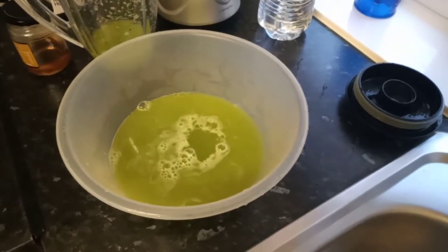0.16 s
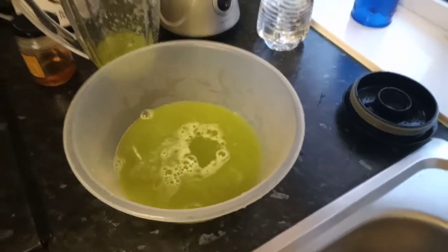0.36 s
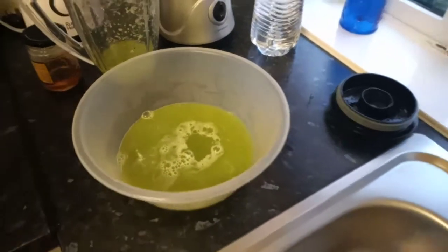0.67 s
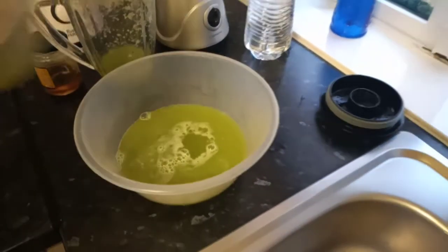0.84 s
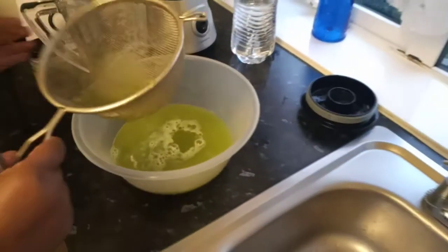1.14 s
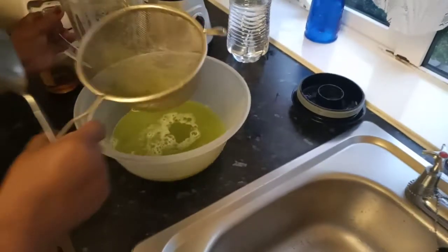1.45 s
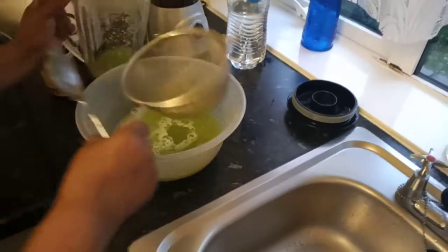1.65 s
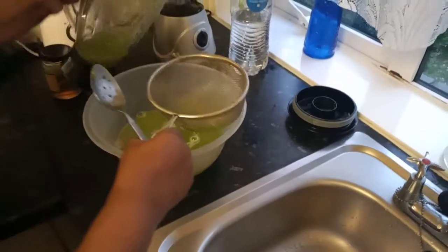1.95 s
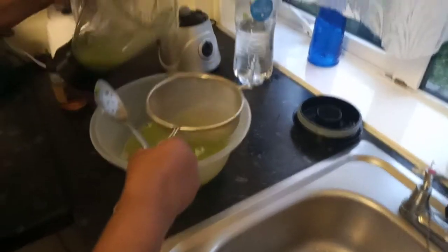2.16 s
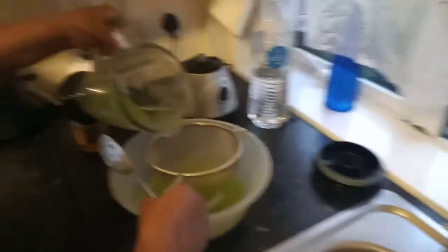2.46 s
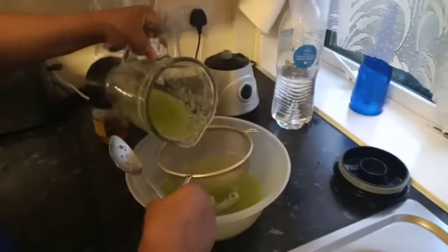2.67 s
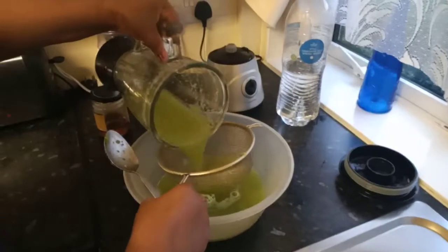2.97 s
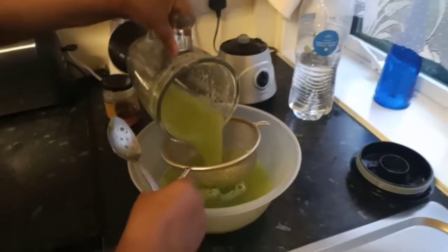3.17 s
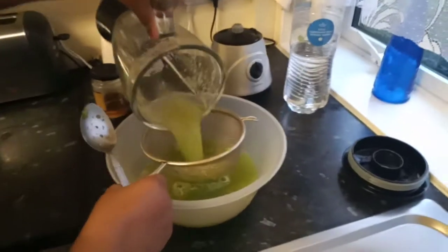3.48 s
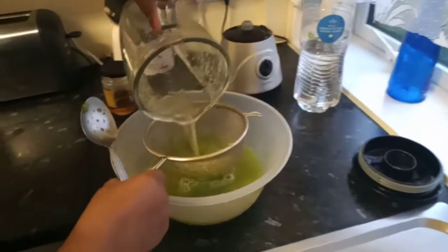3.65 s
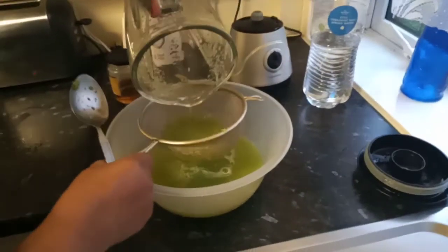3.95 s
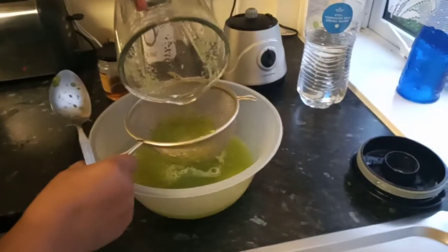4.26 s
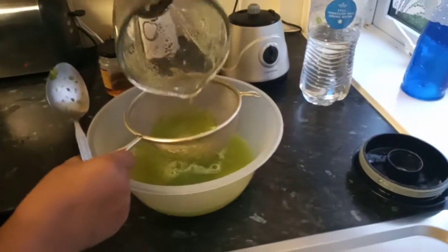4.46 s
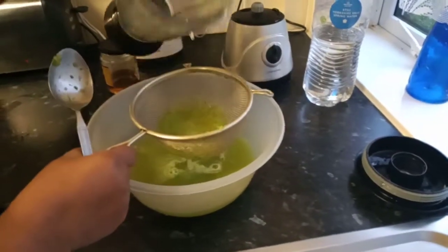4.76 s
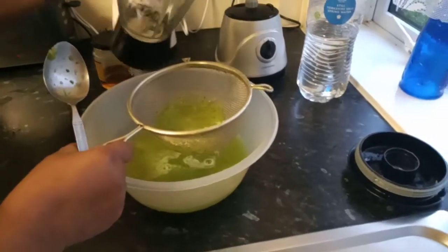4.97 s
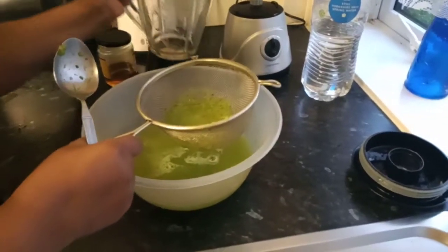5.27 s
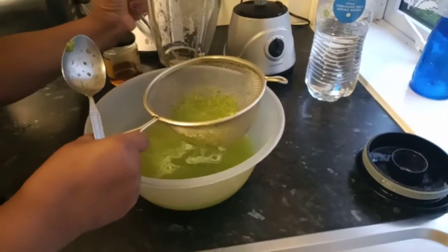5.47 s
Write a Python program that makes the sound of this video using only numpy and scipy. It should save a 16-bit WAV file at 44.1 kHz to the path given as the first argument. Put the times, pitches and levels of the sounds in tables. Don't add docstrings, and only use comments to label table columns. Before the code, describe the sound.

Handheld, close microphone, short hard-walled reverb. First, thin metal rubs and ringing clinks; near two seconds a cluster of hollow thuds from the jug's base, the loudest moment, with a sharp clink. A brief lull and one metal knock follow, then a quick bubbly pour with fizzing and snapping films, ending in sparse light drips over a very quiet fridge hum.

```python
import sys
import numpy as np
from scipy import signal
from scipy.fft import rfft, irfft, next_fast_len
from scipy.io import wavfile
from scipy.ndimage import map_coordinates

SR = 44100
rng = np.random.default_rng(int(sys.argv[2]) if len(sys.argv) > 2 else 0)


def elevation(decibels):
    levels = np.asarray(decibels, float)
    return 10 ** (levels / 20)


def output_pcm(signal):
    pcm = np.clip(np.atleast_2d(signal).T, -1, 1) * 32767
    wavfile.write(sys.argv[1], SR, np.round(pcm).astype(np.int16))


N = 247842


def unit(x):
    return x / np.sqrt(np.mean(x ** 2) + 1e-30)


def in_time(rows):
    s, *columns = np.transpose(rows)
    t = np.arange(N) / SR
    return [elevation(np.interp(t, s, db, -200, -200)) for db in columns]


def colour(x, spectrum):
    size = next_fast_len(N + 8192)
    hz, db = np.transpose(spectrum)
    bins_hz = np.maximum(np.arange(size // 2 + 1) * SR / size, 1)
    gain = elevation(np.interp(np.log(bins_hz), np.log(hz), db))
    cepstrum = irfft(np.log(gain), size)
    cepstrum[1:size // 2] *= 2
    cepstrum[size // 2 + 1:] = 0
    response = np.exp(rfft(cepstrum))
    return irfft(rfft(x, size) * response, size)[:N]


def band(x, low_hz, high_hz):
    return signal.sosfilt(signal.butter(3, [low_hz, high_hz], "band", fs=SR, output="sos"), x)


def drift(rate_hz):
    knots = int(N / SR * rate_hz) + 3
    return map_coordinates(rng.standard_normal(200), [np.linspace(0, knots, N)], order=3, mode="wrap")


def ring(x, hz, t60):
    decay = elevation(-60 / (t60 * SR))
    w = 2 * np.pi * hz / SR
    return signal.lfilter([0, np.sin(w)], [1, -2 * decay * np.cos(w), decay * decay], x + 1e-18)


def grains(per_s, spread_db):
    sizes = elevation(spread_db * np.minimum(rng.exponential(1, N), 5)) * rng.choice([-1, 1], N)
    return unit(sizes * (rng.random(N) < per_s / SR))


def add(out, s, sound):
    i = round(s * SR)
    out[i:i + len(sound)] += sound[:N - i]


def fridge():
    # pitch_hz, level_db (rms), flutter_db
    hum = [(149.5, -77.5, 4.5), (203, -78, 3.0), (307, -88.5, 2), (342.3, -67.5, 2.5), (439, -95, 9),
           (492, -91, 3.0), (1620, -99, 7.5), (3167, -103.5, 11.5), (3490, -100.5, -15.5),
           (3700, -94.5, 7.5), (3740, -88.5, 8)]
    # pitch_hz, level_db (per Hz)
    air = [(30, -18), (60, -7), (150, -2.5), (250, -1), (350, 0.5), (450, -16), (600, -19), (1300, -24),
           (3000, -26), (5800, -26), (8000, -39.5), (13500, -39.5), (15300, -35), (16200, -41)]
    t = np.arange(N) / SR
    lines = 0
    for hz, db, flutter_db in hum:
        level = elevation(db + flutter_db * drift(15))
        lines = lines + level * np.sin(2 * np.pi * hz * t + 0.7 * drift(9))
    air_level = elevation(-70 + 0.91 * drift(6.3))
    return np.sqrt(2) * lines + air_level * unit(colour(rng.standard_normal(N), air))


def slides():
    # start_s, dull_db, bright_db, top_db
    strokes = [
        [(0.0, -101, -81.5, -107), (0.16, -77, -55.5, -63), (0.276, -85, -68, -100), (0.62, -90, -80, -103)],
        [(0.7, -112, -74.5, -93), (0.966, -65.5, -57.5, -79), (1.1, -83, -77, -107)],
        [(1.12, -49.5, -58.5, -76), (1.286, -79.5, -55.5, -61), (1.52, -66.5, -71.5, -107)],
        [(1.56, -80.5, -70.5, -85), (1.65, -38.5, -44, -67.5), (1.85, -93.5, -83.5, -107)],
        [(2.0, -41, -56, -87), (2.024, -49.5, -65.5, -96), (2.312, -96, -70, -104), (2.58, -103, -91, -105)],
    ]
    # pitch_hz, level_db (per Hz)
    friction = [(300, -8), (600, 14), (1500, -1.5), (3500, -3), (6200, 4), (7800, -27.5), (13500, -6),
                (15300, -7.5), (16200, -26.5)]
    # pitch_hz, width_hz, level_db
    mesh = [(900, 90, 10.5), (1800, 62, 1.5), (2200, 45, 6.5), (2703, 110, -2), (4420, 350, 1.5),
            (5960, 260, -0.5)]
    rub = grains(5000, spread_db=1.5) * elevation(2.5 * drift(29.95))
    rim = sum(elevation(db) * unit(ring(rub, hz, 2.2 / width_hz)) for hz, width_hz, db in mesh)
    body = unit(colour(rub, friction)) + elevation(-20.5) * rim
    dull = unit(band(body, 349, 1200))
    bright = unit(band(body, 1800, 8500))
    top = unit(band(body, 8500, 16200))
    out = np.zeros(N)
    for stroke in strokes:
        dull_gain, bright_gain, top_gain = in_time(stroke)
        out += dull_gain * dull + bright_gain * bright + top_gain * top
    return out


def taps():
    # start_s, peak_db, dull_db, top_db, rattle_t60_s
    knocks = [
        (0.142, -34.5, -16, -5, 0.18),
        (0.9542, -49.5, -1.5, -31, 0.083),
        (1.11, -45.5, 6, -7, 0.2),
        (1.2403, -36.5, -7, -12, 0.3),
        (1.8615, -24.5, -16, -13, 0.13),
        (2.596, -34, -6.5, -28, 0.092),
        (2.8848, -67.5, -17, -25, 0.12),
        (5.223, -66.5, -7.5, -23, 0.096),
    ]
    # pitch_hz, level_db, t60_s
    spoon = [(1100, 6.5, 0.27), (1433, 5, 0.14), (2830, -6, 0.21), (3153, -21, 0.33), (3740, -22.5, 0.33),
             (4829, -1, 0.257), (5314, -11, 0.31), (5580, -0.5, 0.37), (6200, -19.5, 0.37),
             (6570, -7.5, 0.29), (6586, 3.5, 0.19), (7140, -10, 0.28)]
    out, t = np.zeros(N), np.arange(SR // 2) / SR
    for s, peak_db, dull_db, top_db, t60 in knocks:
        crack_and_rattle = elevation(-60 * t / 0.038) + elevation(-3.5 - 60 * t / t60)
        burst = rng.standard_normal(len(t)) * crack_and_rattle
        sound = 1.216 * band(burst, 1700, 7210)
        sound += 2.76 * elevation(dull_db) * band(burst, 750, 2000)
        sound += elevation(top_db) * (band(burst, 13800, 16000) + 0.344 * band(burst, 5800, 15000))
        for (hz, mode_db, mode_t60), luck_db in zip(spoon, rng.normal(0, 3.5, len(spoon))):
            strength_db = mode_db + luck_db - 16.5 + dull_db * (hz < 2000)
            sound += elevation(strength_db - 60 * t / mode_t60) * np.sin(2 * np.pi * hz * t)
        add(out, s, elevation(peak_db - 6.5) * sound)
    return out


def thuds():
    # start_s, peak_db, hardness_hz, boom_db
    landings = [
        (0.319, -58.5, 900, -13),
        (1.531, -37, 900, -4),
        (1.863, -18, 900, -6.5),
        (1.901, -11.5, 900, -23),
        (1.929, -26, 900, 6),
        (1.956, -13.5, 900, -5),
        (1.984, -27, 900, -13),
        (2.029, -28, 900, -23),
    ]
    # pitch_hz, level_db, t60_s
    worktop = [(195.2, -0.5, 0.36), (281.1, 8, 0.69), (427, -5.5, 0.45), (486, -14.5, 1.28),
               (543.6, 14.5, 0.58), (630, 7.5, 0.505), (719, -3, 0.586), (807, -3, 0.37), (904, 1, 0.31),
               (940, -32, 1.1), (1040, -43, 1.3), (1075, -37.5, 0.491), (1260, -39, 0.95),
               (1390, -11.5, 0.17), (1570, -45, 0.95), (1730, -37.5, 0.74), (1697, -25.5, 0.32),
               (1880, -39.5, 0.58), (1922, -33, 0.98), (1960, -38.5, 0.55), (2090, -33, 0.43)]
    out, t = np.zeros(N), np.arange(SR // 2) / SR
    for s, peak_db, hard_hz, boom_db in landings:
        board = 0
        for (hz, mode_db, t60), luck, turn in zip(worktop, *rng.normal(0, 1, (2, len(worktop)))):
            strength_db = 0.67 * mode_db + 3.06 * luck + (boom_db + 13) * (hz < 260)
            softness = 1 + (hz / hard_hz) ** 2
            level = elevation(strength_db - 60 * t / (0.5 * t60)) / softness
            board = board + level * np.sin(2 * np.pi * hz * t + 0.89 * turn)
        chatter = band(rng.standard_normal(len(t)) * elevation(-60 * t / 0.1), 99, hard_hz * 1.31)
        sound = board / np.abs(board).max() + 1.25 * chatter
        onset = np.clip(t / 0.0028, 0, 1)
        add(out, s - 0.002, elevation(peak_db - 1.5) * sound * onset)
    return out


def bubbles():
    # start_s, peak_db, pitch_hz, t60_s
    plops = [(3.178, -48.5, 1060, 0.051), (3.231, -52, 1630, 0.05), (3.279, -55, 1620, 0.06),
             (3.308, -59, 850, 0.063), (3.354, -50, 1580, 0.055), (3.373, -39, 1734, 0.054),
             (3.43, -36, 1552, 0.055), (3.471, -39.5, 1237, 0.033), (3.534, -54, 1345, 0.072),
             (3.561, -41, 1528, 0.11), (3.621, -50.5, 1354, 0.042), (3.65, -47, 1585, 0.043),
             (3.708, -61, 1540, 0.06), (3.729, -65, 1510, 0.067), (3.774, -62, 962, 0.11),
             (3.868, -70, 1440, 0.06), (3.91, -70, 890, 0.06), (3.971, -65, 902, 0.069),
             (4.006, -61.5, 1420, 0.063), (4.059, -55.5, 1615, 0.06), (4.136, -77, 1640, 0.06),
             (4.153, -70, 1600, 0.049)]
    blobs = [(3.1783, -56.5, 2290, 0.046), (3.218, -53, 2570, 0.04), (3.2523, -47.5, 1850, 0.035),
             (3.285, -48.5, 2554, 0.035), (3.3254, -43, 2700, 0.037), (3.36, -31, 2347, 0.024),
             (3.4302, -40.5, 2210, 0.031), (3.4551, -46, 2190, 0.04), (3.528, -55, 2800, 0.04),
             (3.5573, -44, 2440, 0.058), (3.5669, -43.5, 2066, 0.062), (3.6198, -39, 2083, 0.058),
             (3.6861, -56, 2100, 0.04), (3.7445, -59, 2140, 0.047), (3.7649, -48, 2070, 0.04),
             (3.8258, -60, 2060, 0.036), (3.8807, -68, 2010, 0.04), (3.8941, -62, 2250, 0.046),
             (3.9799, -67, 2040, 0.04), (4.0513, -62, 2190, 0.047), (4.091, -52, 2540, 0.028),
             (4.1476, -64, 2180, 0.058), (4.2578, -69, 2550, 0.04), (4.302, -68, 2640, 0.04),
             (4.3925, -71.5, 2690, 0.038), (4.5387, -68, 2250, 0.047), (4.6685, -56, 2000, 0.039),
             (4.8, -59.5, 2940, 0.046), (4.8525, -61, 2145, 0.032), (5.1203, -74, 1860, 0.034)]
    drips = [(3.1768, -62, 2820, 0.033), (3.23, -55, 2840, 0.028), (3.2596, -55, 3680, 0.028),
             (3.284, -62, 3580, 0.03), (3.3115, -52, 2990, 0.024), (3.3282, -40.5, 3270, 0.032),
             (3.3549, -52, 3000, 0.03), (3.393, -37.5, 2840, 0.029), (3.4306, -43, 3150, 0.03),
             (3.4467, -40, 3050, 0.022), (3.517, -55, 2800, 0.027), (3.5379, -43.5, 3470, 0.038),
             (3.5669, -44, 3240, 0.03), (3.6881, -58, 3600, 0.03), (3.7123, -53, 4610, 0.03),
             (3.733, -45, 3330, 0.029), (3.7644, -46, 2880, 0.029), (3.794, -52, 3140, 0.032),
             (3.8368, -63, 2900, 0.03), (3.9722, -71, 3710, 0.03), (4.085, -59.5, 3060, 0.03),
             (4.1062, -64, 3500, 0.028), (4.1446, -60, 4350, 0.036), (4.169, -56, 3150, 0.033),
             (4.261, -56.5, 3054, 0.037), (4.2946, -63, 3020, 0.03), (4.613, -73.5, 3580, 0.03),
             (4.626, -62, 3760, 0.03), (4.675, -50.5, 4160, 0.021), (4.8008, -52.5, 4460, 0.028),
             (4.83, -57, 4430, 0.03), (4.8515, -50, 3530, 0.03), (4.884, -56, 4500, 0.024),
             (4.9582, -48.5, 4310, 0.023), (5.0705, -74, 3670, 0.03), (5.122, -67.5, 3070, 0.03)]
    beads = [(3.1778, -73, 4850, 0.03), (3.217, -64, 6130, 0.03), (3.2411, -50.5, 6560, 0.036),
             (3.285, -56, 6640, 0.024), (3.3229, -42.5, 5970, 0.03), (3.3589, -44.5, 6010, 0.03),
             (3.4127, -56, 5500, 0.027), (3.4324, -53, 6050, 0.036), (3.4457, -50, 6480, 0.042),
             (3.518, -50, 5680, 0.035), (3.5357, -49.5, 5740, 0.038), (3.5529, -43, 5800, 0.03),
             (3.5673, -47, 5570, 0.034), (3.5894, -41.5, 5820, 0.037), (3.614, -44, 6080, 0.026),
             (3.6492, -47, 5330, 0.022), (3.7101, -51, 4800, 0.035), (3.767, -51, 5330, 0.033),
             (3.8921, -61, 4700, 0.03), (4.0044, -72, 5760, 0.03), (4.0578, -69, 5970, 0.03),
             (4.0872, -61.5, 5360, 0.034), (4.148, -64, 5430, 0.03), (4.1645, -66, 5740, 0.03),
             (4.2389, -80, 5220, 0.033), (4.2578, -67, 4680, 0.026), (4.2872, -69, 4730, 0.03),
             (4.5396, -62.5, 5560, 0.035), (4.616, -66, 5600, 0.037), (4.67, -58.5, 4470, 0.03),
             (4.8015, -59, 4840, 0.038), (4.828, -55.5, 4560, 0.032), (4.8879, -59.5, 4660, 0.033),
             (4.9497, -58, 4660, 0.035), (4.9932, -58, 5630, 0.03), (5.2082, -72, 5700, 0.03)]
    out, t = np.zeros(N), np.arange(SR // 6) / SR
    rows = plops + blobs + drips + beads
    for (s, peak_db, hz, t60), (apart, turn) in zip(rows, rng.normal(0, 1, (len(rows), 2))):
        phase = 2 * np.pi * hz * (0.985 * t + 0.95 * t ** 2)
        neighbour = 0.82 * np.sin(phase * (1 + 0.073 * apart) + 2 * turn)
        envelope = elevation(peak_db - 60 * t / t60) * (1 - np.exp(-t / 0.0012))
        add(out, s - 0.001, envelope * (np.sin(phase) + neighbour))
    return out


def spatter():
    # start_s, gurgle_db, fizz_db, spray_db
    pour = [
        (3.15, -84, -88, -90),
        (3.246, -72, -64.5, -86),
        (3.36, -68, -59, -82),
        (3.484, -67.5, -63, -79),
        (3.624, -71, -60, -73),
        (3.788, -73.5, -81, -88),
        (4.35, -95, -99, -86),
    ]
    # start_s, peak_db
    bursts = [(3.1773, -68), (3.2157, -73), (3.2406, -66), (3.3229, -49.5), (3.4023, -57), (3.4296, -52),
              (3.4457, -47.5), (3.517, -65), (3.554, -55), (3.57, -42), (3.5946, -50.5), (3.6522, -50),
              (3.6851, -57), (3.7084, -56), (3.743, -44.5), (3.8088, -55), (3.8822, -77), (4.0034, -69),
              (4.0463, -77), (4.0857, -65), (4.0952, -68), (4.1326, -69), (4.207, -75), (4.2418, -73),
              (4.2848, -69), (4.3217, -73), (4.614, -74), (4.826, -64.5), (4.9023, -68), (4.9916, -67)]
    gurgle, fizz, spray = in_time(pour)
    clicks, size_class = grains(1400, spread_db=7.0), rng.integers(0, 24, N)
    pitches_hz = np.geomspace(1100, 7000, 24)
    rings = [ring(clicks * (size_class == k), hz, 50 / hz) for k, hz in enumerate(pitches_hz)]
    large, small = unit(sum(rings[:15])), unit(sum(rings[15:]))

    snaps = elevation(-1) * spray * grains(3000, spread_db=10.0) * elevation(3.0 * drift(35))
    t = np.arange(2000) / SR
    for s, peak_db in bursts:
        add(snaps, s, elevation(peak_db + 6 - 60 * t / 0.034) * rng.standard_normal(len(t)))
    snaps = colour(snaps, [(2000, -30), (6000, -2), (8000, -20.5), (13000, -9.5), (15200, 1), (16100, 2)])
    return gurgle * large + fizz * small + snaps


def kitchen(x, gap_s=0.0028):
    # pitch_hz, t60_s
    decay = [(150, 0.52), (700, 0.27), (2500, 0.24), (6000, 0.27), (14000, 0.151)]
    decay_hz, decay_s = np.transpose(decay)
    t, tail = np.arange(SR // 2) / SR, 0
    for hz in 90 * 2.0 ** np.arange(8):
        t60 = np.interp(np.log(hz), np.log(decay_hz), decay_s)
        octave = band(rng.standard_normal(len(t)), hz / np.sqrt(2), hz * np.sqrt(2))
        tail = tail + octave * elevation(-60 * t / t60)
    tail = tail * np.clip(t / gap_s - 1, 0, 1)
    return signal.fftconvolve(x, tail / np.sqrt(np.sum(tail ** 2)))[:N]


def scene():
    hum, rubbing = fridge(), slides()
    hits = taps() + thuds()
    juice = bubbles() + spatter()
    echo = kitchen(elevation(-9) * hits + elevation(-5.5) * juice + elevation(-30) * rubbing)
    return (hits + juice + rubbing + echo + hum)[None]


def roll_off(x):
    return signal.sosfilt(signal.butter(12, 16600, fs=SR, output="sos"), x)


def record(dry):
    mix = signal.sosfilt(signal.cheby2(10, 45, 16500, fs=SR, output="sos"), dry)
    return roll_off(mix)


dry = scene()
out = record(dry)
output_pcm(out)
```